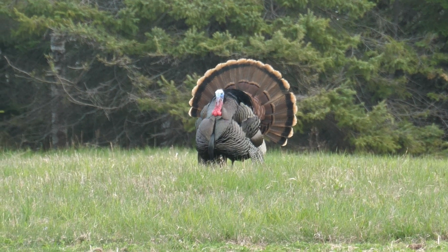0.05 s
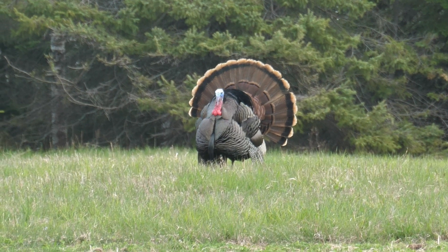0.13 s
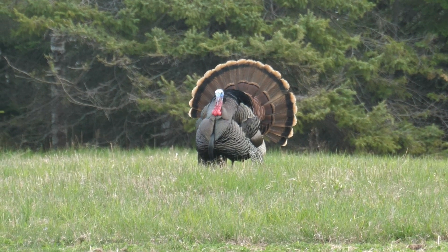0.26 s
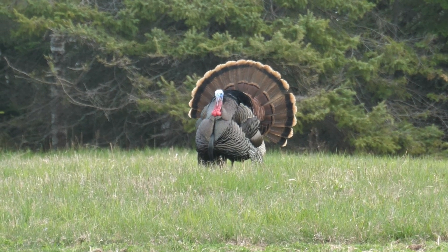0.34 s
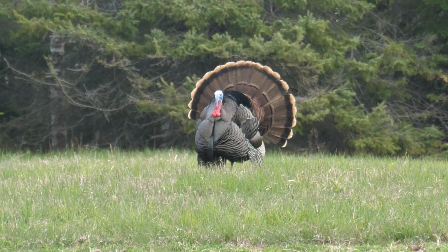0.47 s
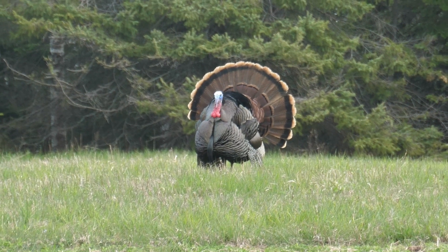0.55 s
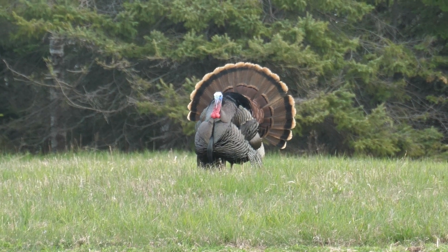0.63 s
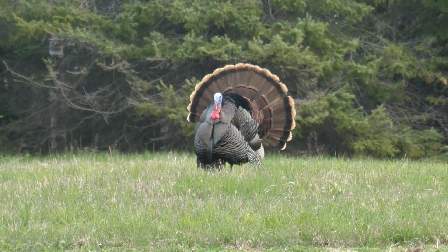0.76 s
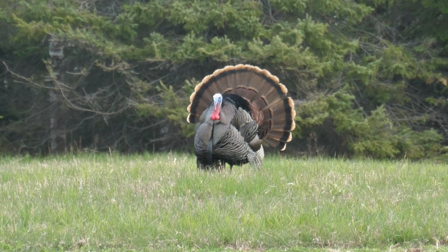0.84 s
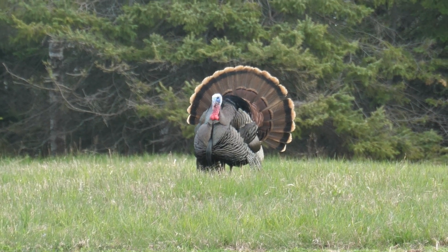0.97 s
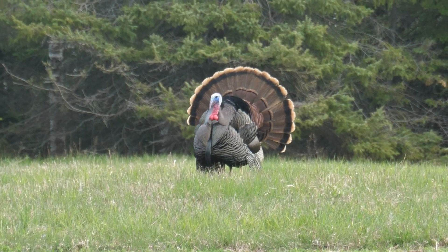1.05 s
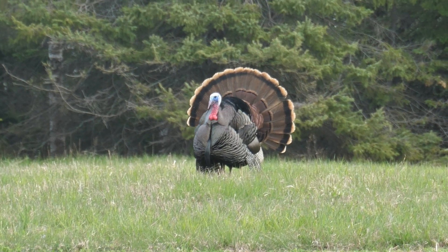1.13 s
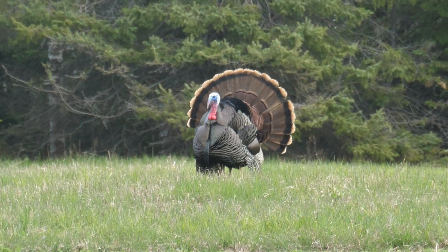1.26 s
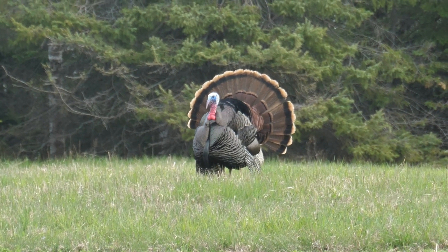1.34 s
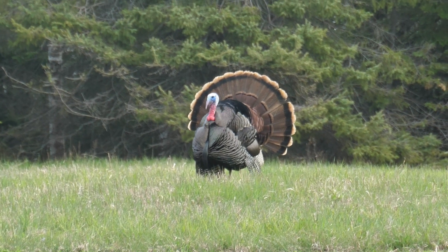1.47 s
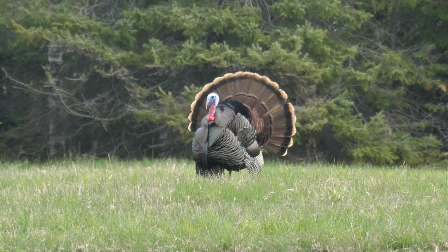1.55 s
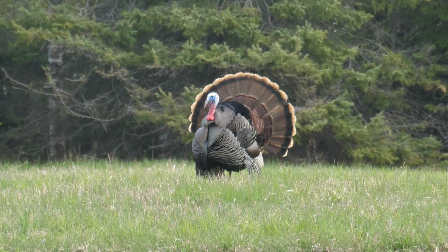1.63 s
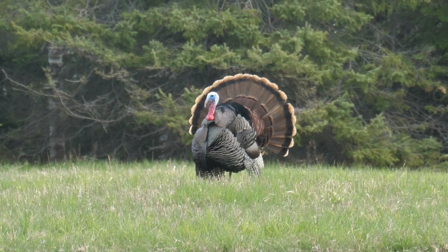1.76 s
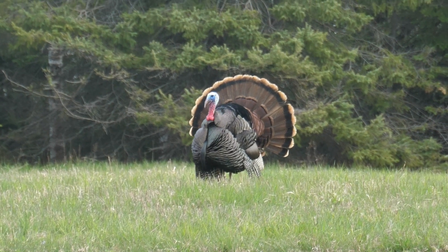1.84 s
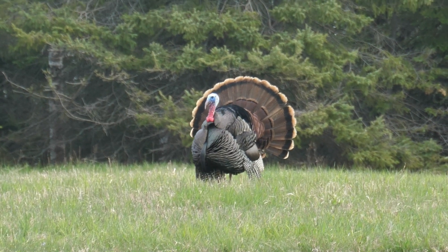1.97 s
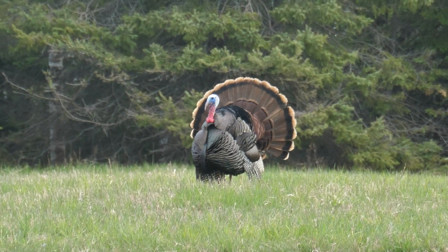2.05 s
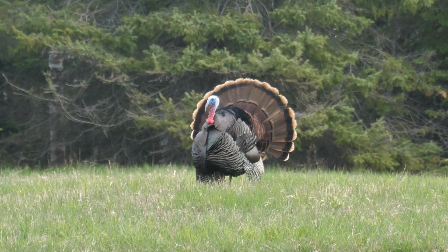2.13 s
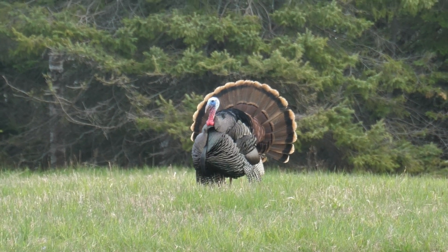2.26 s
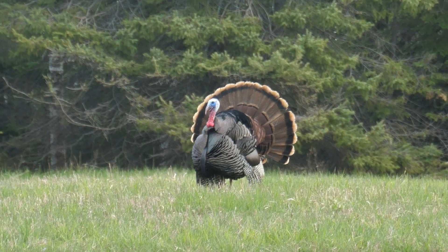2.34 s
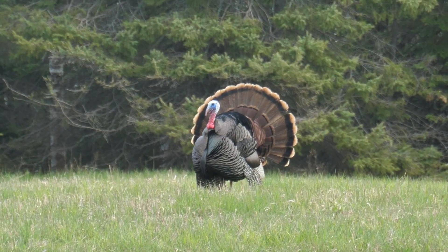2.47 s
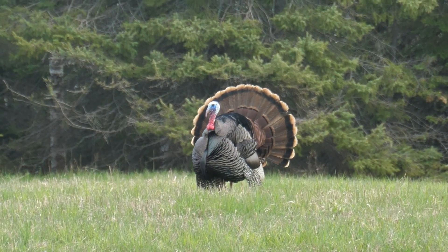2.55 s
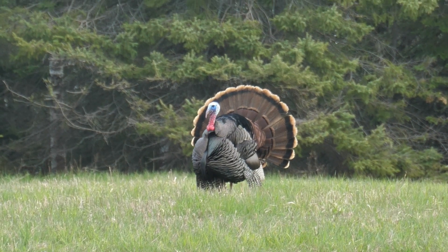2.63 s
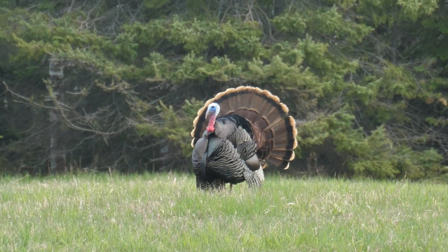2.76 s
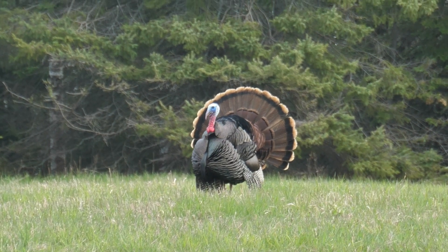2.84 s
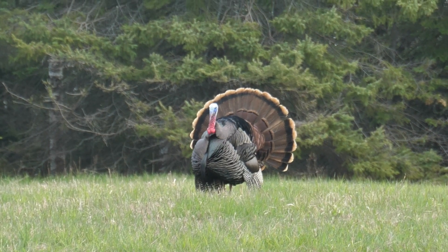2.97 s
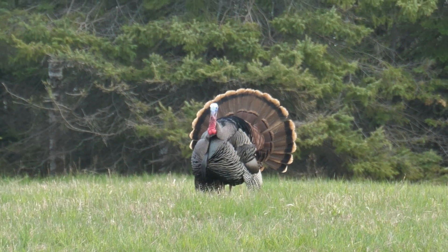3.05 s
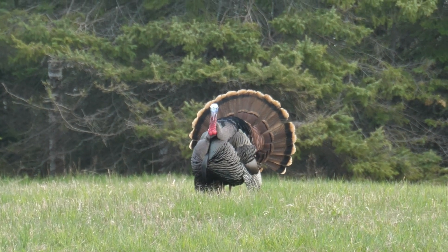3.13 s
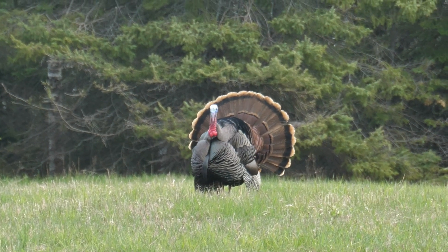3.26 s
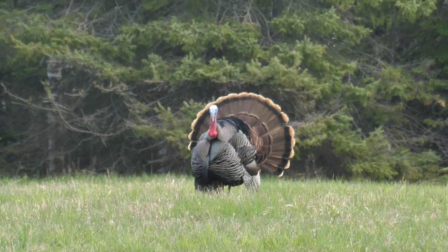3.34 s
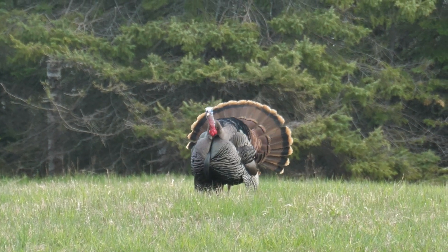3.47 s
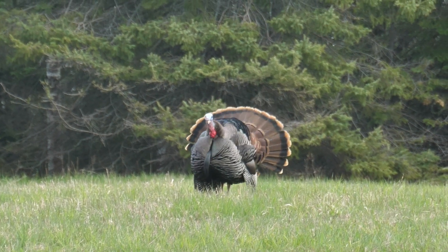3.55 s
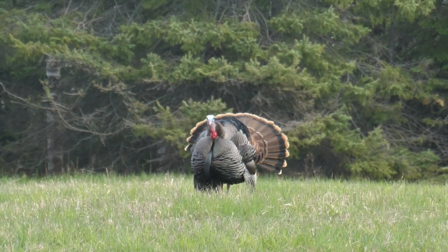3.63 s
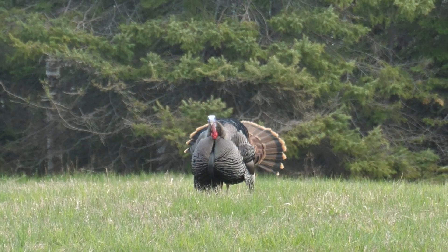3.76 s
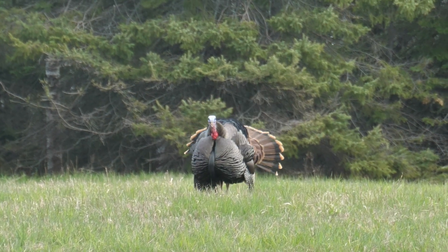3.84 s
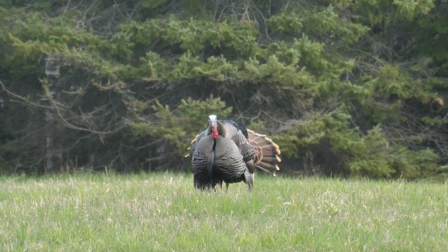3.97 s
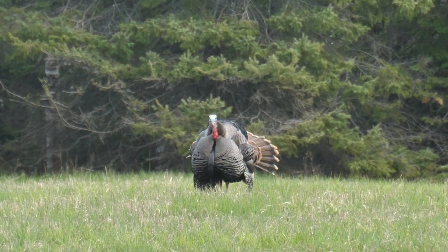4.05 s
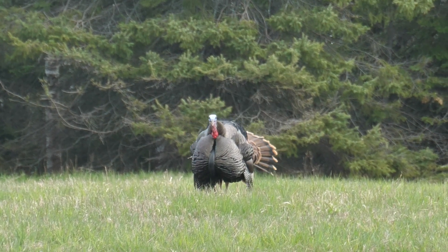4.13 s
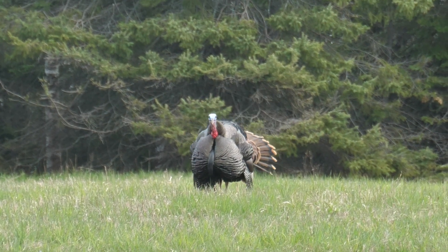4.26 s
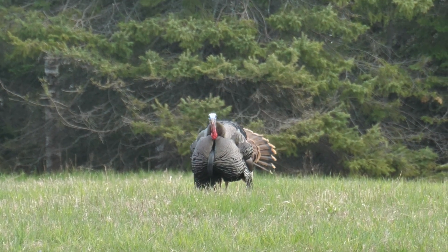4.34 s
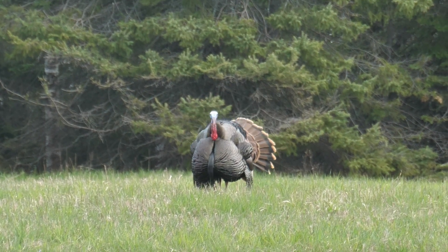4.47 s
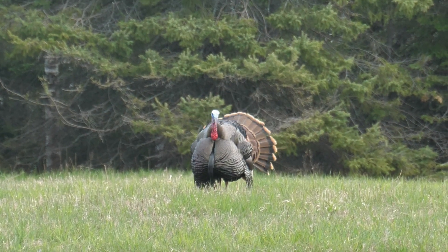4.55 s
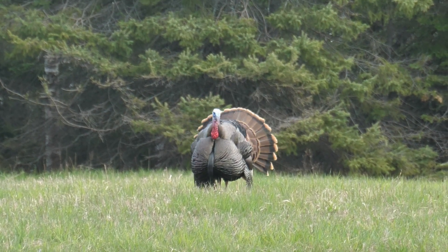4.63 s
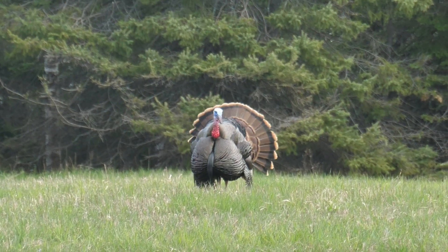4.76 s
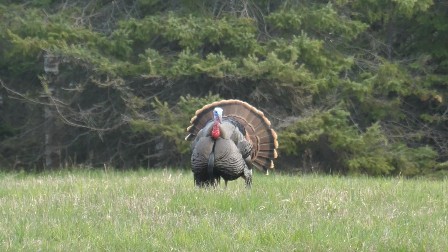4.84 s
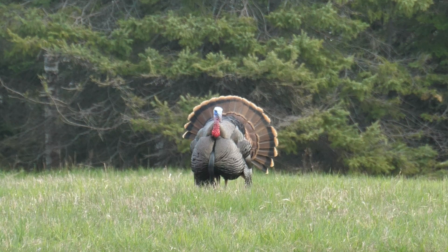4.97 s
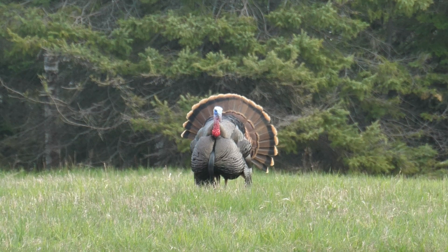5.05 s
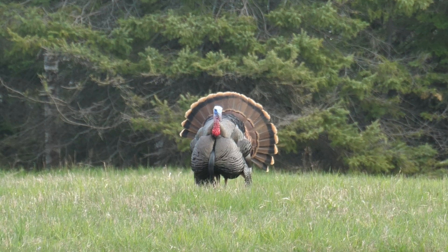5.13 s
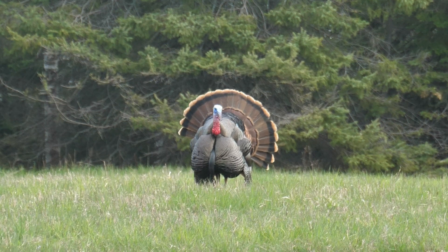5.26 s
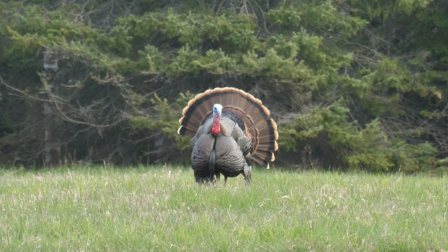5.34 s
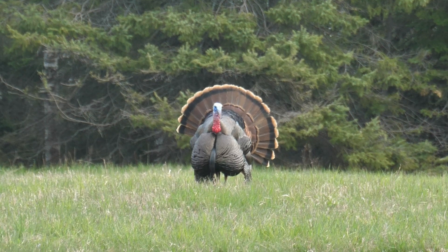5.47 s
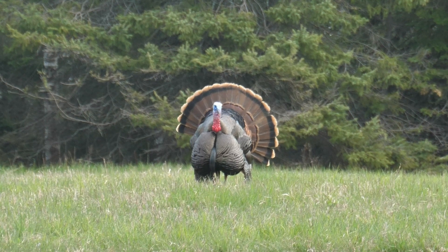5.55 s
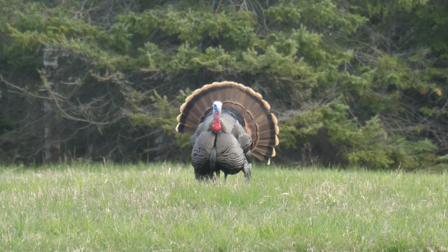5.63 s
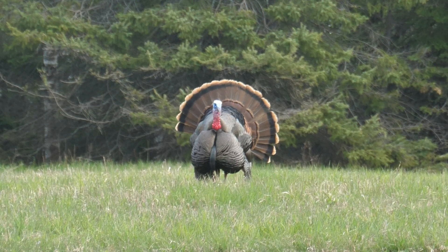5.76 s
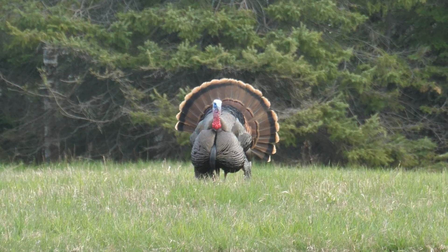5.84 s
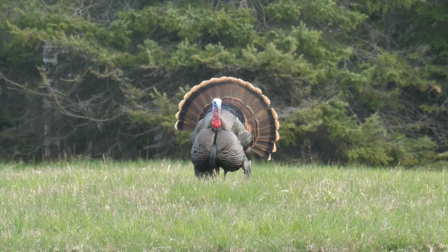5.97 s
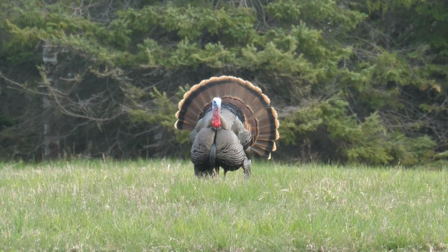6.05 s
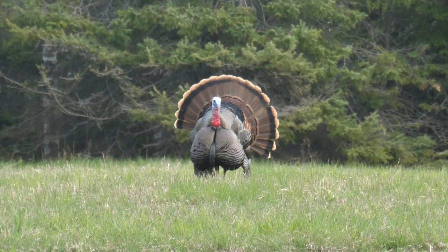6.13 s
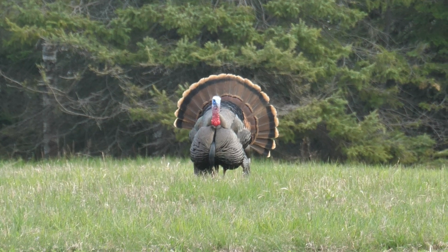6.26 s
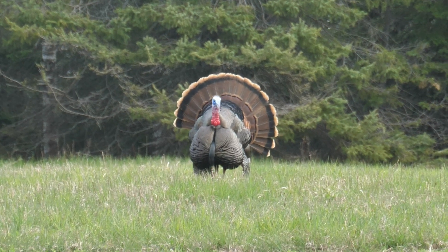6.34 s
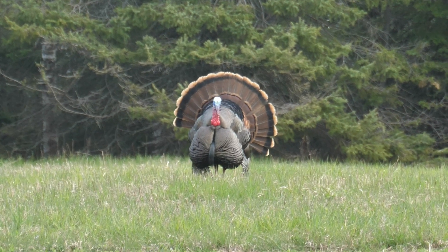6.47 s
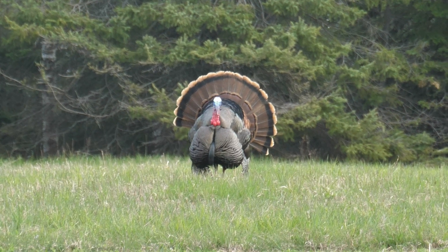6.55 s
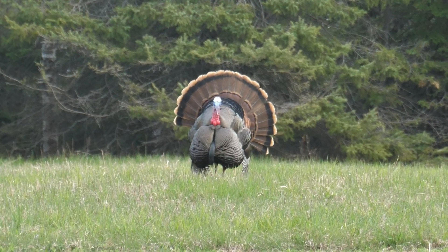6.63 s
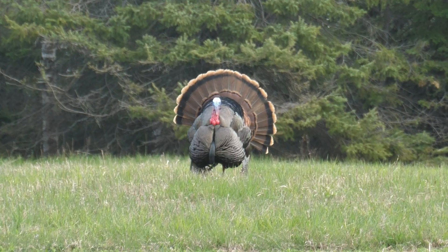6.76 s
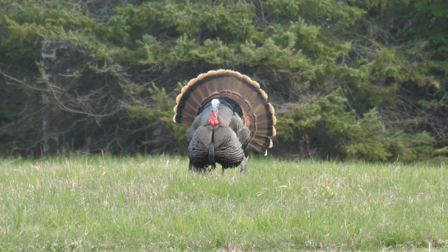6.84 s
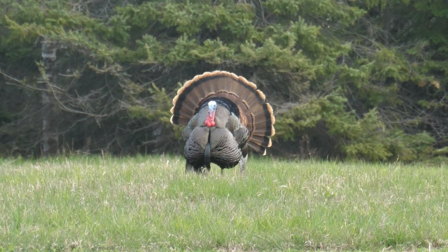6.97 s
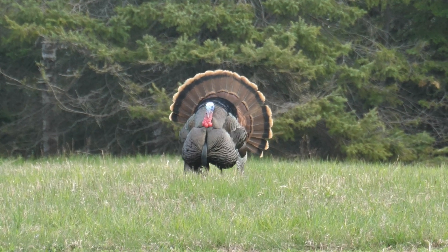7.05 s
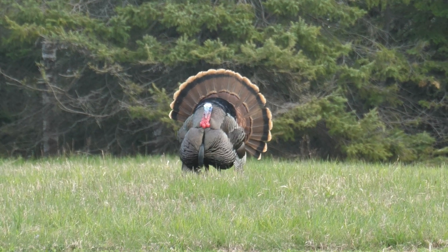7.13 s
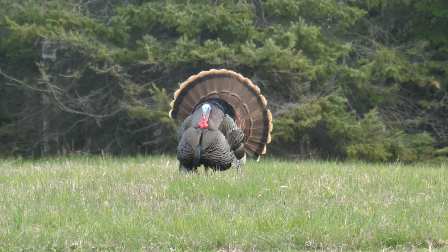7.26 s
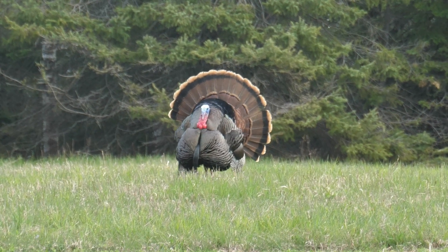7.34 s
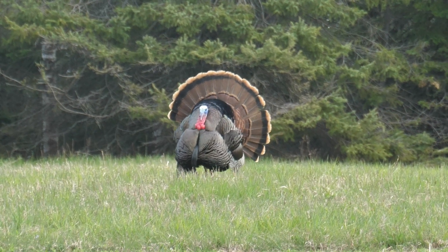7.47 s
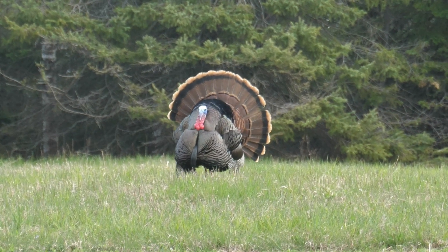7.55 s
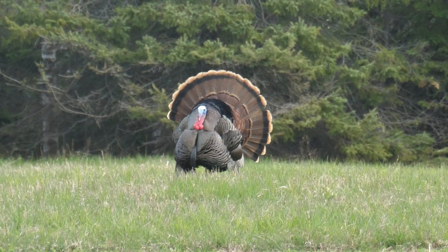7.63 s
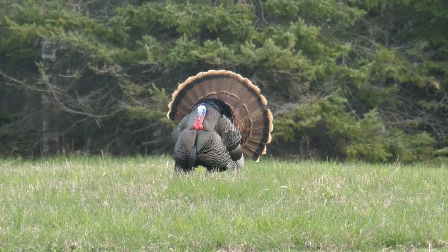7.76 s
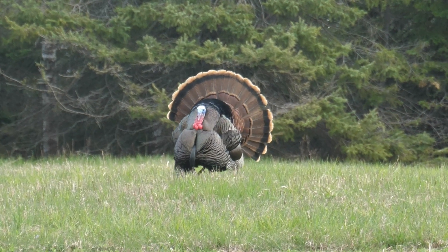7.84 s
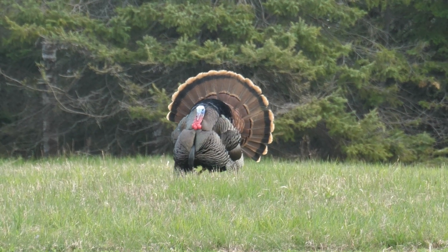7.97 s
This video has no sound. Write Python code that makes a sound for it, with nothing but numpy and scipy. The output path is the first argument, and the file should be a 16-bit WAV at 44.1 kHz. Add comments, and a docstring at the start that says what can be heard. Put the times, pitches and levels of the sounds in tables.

```python
"""A meadow before a wall of spruce. A wild turkey gobbles once, two harsh yelps and a rattle of short
notes, as his syrinx drives the resonances of throat and mouth; later he spits one dry puff of air.
Songbirds whistle gliding tones, a far call fades, and the trees scatter turkey and songbirds back as
echoes. Light air rumbles softly, with a few low thumps. The sound is all but mono."""
import sys
import numpy as np
from scipy import signal
from scipy.fft import rfft, irfft, next_fast_len
from scipy.io import wavfile

SR = 44100
rng = np.random.default_rng(int(sys.argv[2]) if len(sys.argv) > 2 else 0)


def waveform_to_disk(signal):
    """Save audio, clipped to [-1, 1], as 16-bit WAV at the path in sys.argv[1]."""
    frames = np.transpose(np.atleast_2d(signal))
    scaled = np.clip(frames, -1, 1) * 32767
    samples = np.round(scaled).astype(np.int16)
    wavfile.write(sys.argv[1], SR, samples)


N = 352800

# The yelps that open the gobble. Each row: start and length in seconds, effort in dB, the mouth
# resonance's first and last frequency and width in Hz, upper resonance in Hz, its relative level in dB.
YELPS = [(3.537, 0.062, -23, 1850, 1790, 915, 3200, -1), (3.593, 0.061, -20, 2100, 1240, 560, 4800, -8.5)]


def yelp(start, length, effort_db, first_hz, last_hz, width_hz, upper_hz, upper_db,
         pulse_hz=630, jitter=0.19, shimmer_db=1.5, rasp=0.035, attack_s=0.017, release_s=0.035):
    """Source and filter: uneven syrinx pulses ring a mouth resonance that drops as the neck extends."""
    t = np.arange(0, length, 1 / SR)
    n = len(t)
    drop = (1 + np.tanh((t - 0.024) / 0.0089)) / 2  # halfway down after 24 ms
    mouth_hz = first_hz + (last_hz - first_hz) * drop
    cycles = np.cumsum(pulse_hz * (1 + jitter * wander(n, 392))) / SR
    pulses = np.diff(np.floor(cycles), prepend=0) * amp(shimmer_db * wander(n, 500))
    source = butterworth(pulses + rasp * wander(n, SR), 2, [600, 7500])
    mouth = unit_rms(resonate(source, mouth_hz, width_hz))
    upper = amp(upper_db) * unit_rms(resonate(source, upper_hz, width_hz=1900))
    direct = amp(-13) * unit_rms(butterworth(source, 4, [3800, 6200]))  # straight out of the open beak
    envelope = np.minimum(t / attack_s, 1) * ramp((length - t) / release_s)
    return start, amp(effort_db) * (mouth - upper + direct) * envelope


# Three families of windpipe and throat resonances. Each row: frequency in Hz, width in Hz, gain in dB.
LOW_MODES = [(1020, 340, 12), (564, 53, -9)]
RING_MODES = [(3173, 310, 4.5), (3730, 380, -2.5)]
OVERTONE_MODES = [(2220, 1070, 9.5), (4100, 1100, 5.5), (5300, 1200, 5), (6720, 530, 0.5)]


def gobble_note(peak, length, hz, glide, rough, low_db, ring_db, overtones_db,
                lean=0, throat_tuning=1, jitter=0.1066, flutter=2.67, slope_db_per_octave=-5.5):
    """Amplitude modulation: a slower second vibration of the syrinx adds sidebands to a harmonic tone."""
    t, bell = swell(length, lean)
    n = len(t)
    settle_s = 0.67 * length
    octaves = glide * settle_s * np.tanh(t / settle_s)  # the pitch slides fastest at the peak
    cycles = np.cumsum(hz * 2 ** octaves * (1 + jitter * rough * wander(n, 605))) / SR
    tone = unit_rms(sum(amp(slope_db_per_octave * np.log2(k)) * np.cos(2 * np.pi * k * cycles)
                        for k in range(1, 9)))
    modulator = np.cos(2 * np.pi * .44 * cycles + .7 * wander(n, 120))
    source = tone * (1 + flutter * rough * modulator) + rough * wander(n, SR)
    low = amp(low_db) * formants(source, LOW_MODES)
    ring = amp(ring_db) * formants(source, np.multiply(RING_MODES, [throat_tuning, 1, 1]))
    overtones = amp(overtones_db) * formants(source, OVERTONE_MODES)
    direct = amp(overtones_db - 25.5) * unit_rms(butterworth(source, 2, [6400, 9000]))  # open beak
    return peak + t[0], (low + ring + overtones + direct) * bell


# The rattle's loud notes, mostly paired. Each row: peak time and length in seconds, pitch in Hz, glide in
# octaves per second, lean from -1 (sharp start) to 1 (sharp end), level in dB, roughness from 0 to 1,
# then the low and ring resonances in dB relative to that level.
RATTLE_NOTES = [ (3.687, .011, 1028, -7, -0.1, -30, 0.22, -2, 9),
                (3.734, .015, 1077, -4, -0.36, -26, 0.66, 3, -1.5),
                (3.776, 0.025, 1091, -1.5, 0.27, -24.5, 0.5, 2.5, 1.5),
                (3.882, 0.013, 1044, -4.5, -.35, -27.5, .37, -4.5, 3),
                (3.923, 0.014, 1065, -4.5, 0, -24.5, 0.39, -1.5, 2.5),
                (4.038, 0.018, 1040, -4.5, -0.53, -30, 0.32, -6.5, 3.5),
                (4.077, .009, 1018, -14, 0, -26.5, 0.31, 3, -2),
                (4.200, 0.015, 1026, -2.5, -.4, -27, 0.34, 0.5, 4),
                (4.245, 0.018, 1026, -9.5, 0.45, -27, 0.23, 1, 1),
                (4.361, .010, 1050, -8, -0.34, -28.5, 0.2, -6, 1),
                (4.402, 0.02, 1100, -4.5, 0.41, -25.5, 0.24, -7, -1),
                (4.523, .018, 1102, -3, -0.097, -27.5, 0.09, -4, -0.5)]
# Between pairs the voice slackens into a dull hoot and a hoarse burr. Each row: burr time in seconds,
# burr level in dB, the hoot's lead in seconds, its pitch in Hz, its level in dB.
SLACK_NOTES = [(3.819, -37, .008, 1103, -25.5), (3.978, -31.5, .023, 925, -27), (4.154, -33, .02, 898, -36),
               (4.317, -34.5, .025, 846, -35), (4.479, -34, .028, 921, -37)]
# A hum while the bird pushes hardest: peak time and length in seconds, pitch in Hz, level in dB.
UNDERTONE = (4, 0.55, 1079.5, -40.5)


def rattle():
    """Tension shapes timbre: sharp falling notes alternate with slack hoots and tight-throated burrs."""
    voice = np.zeros(N)
    for peak, length, hz, glide, lean, db, rough, low_db, ring_db in RATTLE_NOTES:
        add(voice, *gobble_note(peak, length, hz, glide, rough, db + low_db, db + ring_db, db, lean))
    for peak, burr_db, lead, hoot_hz, hoot_db in SLACK_NOTES:
        add(voice, *gobble_note(peak - lead, length=.02, hz=hoot_hz, glide=-4, rough=0.51,
                                low_db=hoot_db, ring_db=hoot_db - 5.5, overtones_db=hoot_db - 5.5))
        add(voice, *gobble_note(peak, length=.026, hz=1083, glide=0, rough=0.5, throat_tuning=1.019,
                                low_db=burr_db - 3, ring_db=burr_db + 3, overtones_db=burr_db))
    peak, length, hz, db = UNDERTONE
    add(voice, *gobble_note(peak, length, hz, glide=-.7, rough=.35,
                            low_db=db, ring_db=db - 14, overtones_db=db - 14))
    return voice


# The beak's resonances in the spit. Each row: frequency in Hz, width in Hz, gain in dB.
BEAK_MODES = [(2640, 1200, 1.5), (4900, 1300, 1), (6800, 2200, -3)]


def spit(start=7.047, length=0.042, db=-32.5, decay_db_per_s=250, attack_s=0.0047, release_s=0.016):
    """Turbulence: a puff of air forced through the beak hisses and excites its resonances."""
    t = np.arange(0, length, 1 / SR)
    hiss = butterworth(wander(len(t), SR), 3, [1700, 9500])
    puff = ramp(t / attack_s) * amp(db - decay_db_per_s * t) * ramp((length - t) / release_s)
    return start, formants(hiss, BEAK_MODES) * puff


def whistle(start, length, from_hz, to_hz, db, waver_hz=12, fade_db=-5, flutter_db=3, attack_s=0.0063):
    """Scattering frays a songbird's gliding tone, most in the low notes from deeper in the boughs."""
    t = np.arange(0, length, 1 / SR)
    n = len(t)
    hz = from_hz * (to_hz / from_hz) ** (t / length)
    cycles = np.cumsum(hz + waver_hz * wander(n, 150)) / SR
    fray = 0.57 / (1 + (hz / 3300) ** 8) * wander(n, 170)
    tone = unit_rms(np.sin(2 * np.pi * cycles) + fray * np.cos(2 * np.pi * cycles))
    level = amp(db + fade_db * t / length + flutter_db * wander(n, 55))
    return start, tone * level * ramp(t / attack_s) * signal.windows.tukey(n, .15)


# Slurred whistles. Each row: start and length in seconds, first and last pitch in Hz, relative level in dB.
WHISTLES = [ (0, .14, 3320, 3310, -55), (.01, 0.084, 2580, 2320, -53), (0.12, 0.049, 2416, 2470, -43.5),
            (0.16, 0.12, 2786, 2200, -42), (0.397, 0.094, 2380, 2240, -43.5),
            (1.22, .14, 4300, 4220, -53.5), (1.328, .105, 4160, 4180, -46.5),
            (1.782, 0.063, 3870, 3890, -46), (1.803, 0.12, 3540, 3580, -53),
            (2.878, 0.093, 4100, 3850, -52), (3.239, .028, 4150, 4050, -45), (3.378, .03, 3750, 3200, -45),
            (3.41, 0.089, 2710, 2375, -40), (4.026, 0.062, 2840, 2900, -32.5),
            (4.24, 0.064, 2750, 2550, -37), (4.597, 0.026, 3280, 2830, -44),
            (4.641, 0.067, 2824, 2870, -38.5), (4.677, 0.042, 2940, 3180, -39.5),
            (4.738, 0.061, 2596, 2636, -40.5), (5.2, 0.062, 2505, 2660, -43),
            (5.221, 0.063, 3100, 1994, -41.5), (5.268, .07, 2020, 2100, -48), (5.29, .08, 2520, 2410, -46),
            (5.771, 0.063, 2360, 2440, -46.5), (5.825, 0.096, 2714, 2260, -38.5),
            (6.039, 0.092, 2386, 2210, -42.5), (6.185, 0.057, 2310, 2240, -50)]
# Another small bird's thin chips. Each row: start in seconds, pitch in Hz, relative level in dB.
CHIPS = [(1.61, 6770, -42), (3.012, 6770, -47), (3.99, 7000, -42), (5.355, 6960, -49.5), (7.522, 7050, -47)]


def songbirds(chip_rise=1.069, twitter_hz=3800):
    """Frequency sweeps make birdsong: slurred whistles, rising chips and a faint twitter farther back."""
    song = np.zeros(N)
    for row in WHISTLES:
        add(song, *whistle(*row))
    for start, hz, db in CHIPS:
        add(song, *whistle(start, 0.0363, hz, hz * chip_rise, db, waver_hz=188))
    for start in np.linspace(2.1, 2.9, 12):
        offset, slur = rng.uniform(-0.41, 0.1, 2)
        hz = twitter_hz * 2 ** offset
        add(song, *whistle(start, 0.052, hz, hz * 2 ** (slur / 2), db=-57))
    return song


def far_call(length=1.18, hz=892, sag_hz_per_s=42, width_hz=170, db=-49.5, fade_db=-6):
    """Attenuation with distance leaves a call's lowest partial, smeared by the woods to a narrow band."""
    t = np.arange(0, length, 1 / SR)
    band = unit_rms(resonate(wander(len(t), SR), hz - sag_hz_per_s * t, width_hz))
    return 0, band * amp(db + fade_db * (t / length) ** 2) * signal.windows.tukey(len(t), .05)


# Reverberation time of the woods. Each row: frequency in Hz, time to fall 60 dB in seconds.
WOODS_T60 = [(500, .8), (1100, .9), (2500, 1.0), (3500, .7), (7000, .35)]
# Spectra of the turkey's and the songbirds' echoes. Each row: frequency in Hz, relative gain in dB.
TURKEY_ECHO = [(500, 9), (1000, 4.5), (1500, 2), (2200, -3), (3300, -6.5), (7000, -9)]
SONGBIRD_ECHO = [(2500, -3.5), (4200, -8), (7000, -12)]


def woods(sound, colour, bands=8, echoes_per_s=1500, build_up_s=.03):
    """Reverberation: trunks and boughs scatter a call back as sparse echoes; the treble dies first."""
    t, hz = np.arange(SR) / SR, np.fft.rfftfreq(SR, 1 / SR)
    echoes = rng.standard_normal(SR) * (rng.random(SR) < echoes_per_s / SR)
    spectrum = rfft(unit_rms(echoes))
    build_up = (1 - np.exp(-t / build_up_s)) ** 2
    centres, tail = np.geomspace(400, 8000, bands), np.zeros(SR)
    for centre, share in zip(centres, np.eye(bands)):
        envelope = build_up * amp(-60 * t / value_at(WOODS_T60, centre))
        band = irfft(spectrum * np.interp(hz, centres, share), SR)
        tail += amp(value_at(colour, centre)) * band * envelope / np.linalg.norm(envelope)
    return signal.fftconvolve(sound, tail)[:N]


# Soft low thumps. Each row: peak time and length in seconds, frequency in Hz, level in dB.
THUMPS = [(0.133, 0.066, 120, -40), (.14, 0.093, 57.7, -41), (0.805, 0.034, 115, -39),
          (3.274, 0.045, 64, -40), (4.04, 0.048, 124, -35.5), (4.229, 0.114, 65.5, -42),
          (4.426, 0.47, 76.5, -46.5), (6.098, 0.018, 129, -32), (7.859, 0.05, 125, -40.5)]


def thump(peak, length, hz, db):
    """A tone burst: bass of wandering phase swells and fades."""
    t, bell = swell(length)
    bass = unit_rms(np.sin(2 * np.pi * hz * t + .5 * wander(len(t), 38)))
    return peak + t[0], amp(db) * bell * bass


# The spectrum of the open air. Each row: frequency in Hz, relative spectral density in dB.
AIR_SPECTRUM = [(8.8, -47), (15, 10.5), (28, -0.5), (108, -1), (158, -5.5), (205, -3), (299, -6.5),
                (345, -6.5), (825, -11.5), (1430, -14.5), (1560, -16.5), (1920, -16), (2880, -18),
                (3230, -19.5), (15500, -28)]
# One gust: peak time and half length in seconds, lift of the rumble in dB.
GUST = (0.12, 0.031, 6.3)


def air(wash_db=-41, rumble_top_hz=250, drift_db=-1.53, drift_hz=1, side_db=-71):
    """Broadband noise whose bass is modulated by the breeze; a trace of hiss differs between the ears."""
    t, hz = np.arange(N) / SR, np.fft.rfftfreq(N, 1 / SR)
    spectrum = rfft(rng.standard_normal(N)) * amp(value_at(AIR_SPECTRUM, hz))
    wash = amp(wash_db) * unit_rms(irfft(spectrum, N))
    rumble = irfft(rfft(wash) / (1 + (hz / rumble_top_hz) ** 4), N)
    peak, half_length, lift_db = GUST
    gust_db = lift_db * np.exp(-((t - peak) / half_length) ** 2)
    breeze = amp(gust_db + drift_db * wander(N, drift_hz))
    side = amp(side_db) * unit_rms(butterworth(rng.standard_normal(N), 8, 5200, "high"))
    return wash + rumble * (breeze - 1) + np.array([side, -side])


def resonate(x, hz, width_hz):
    """Resonance: two stages with unit gain at a centre frequency that may glide."""
    carrier = np.exp(2j * np.pi * np.cumsum(hz * np.ones(len(x))) / SR)
    r = np.exp(-np.pi * width_hz / SR)
    baseband = signal.lfilter([(1 - r) ** 2], [1, -2 * r, r * r], x / carrier + 1e-18)
    return 2 * (carrier * baseband).real


def formants(x, modes):
    """Parallel resonances, summed to rms 1; alternating signs keep the valleys between them filled."""
    return unit_rms(sum((-1) ** k * amp(db) * resonate(x, hz, width_hz)
                        for k, (hz, width_hz, db) in enumerate(modes)))


def butterworth(x, order, edges_hz, kind="band"):
    """A filter with a maximally flat passband."""
    return signal.sosfilt(signal.butter(order, edges_hz, kind, fs=SR, output="sos"), x)


def wander(size, hz):
    """Low-passed noise of rms about 1 that changes about hz times a second."""
    span = max(2 ** 15, next_fast_len(size))
    lowpass = np.exp(-(np.fft.rfftfreq(span, 1 / SR) / hz) ** 2)
    return unit_rms(irfft(rfft(rng.standard_normal(span)) * lowpass, span))[:size]


def swell(length, lean=0):
    """Time around a peak, and a bell above half height for the given length; lean lengthens the rise."""
    rise, fall = length * (1 + np.clip(lean, -.8, .8) * np.array([1, -1]))
    t = np.arange(-1.7 * rise, 1.7 * fall, 1 / SR)
    bell = 2 ** -(abs(2 * t / np.where(t < 0, rise, fall)) ** 1.7)
    return t, bell * signal.windows.tukey(len(t), .2)


def ramp(x):
    """A smooth step from 0 to 1 as x goes from 0 to 1."""
    return np.sin(np.pi / 2 * np.clip(x, 0, 1)) ** 2


def amp(db):
    """Decibels to gain."""
    return 10 ** (np.asarray(db) / 20)


def unit_rms(x):
    """Scales to rms 1."""
    return x / np.sqrt(np.mean(x ** 2) + 1e-20)


def value_at(points, hz):
    """Interpolation on a log-frequency axis."""
    frequencies, values = np.transpose(points)
    return np.interp(np.log(hz + 1), np.log(frequencies + 1), values)


def add(mix, start, sound):
    """Mixes a sound in at a start time in seconds."""
    part = mix[max(round(start * SR), 0):][:len(sound)]
    part += sound[:len(part)]


def scene(turkey_echo_db=-7, bird_db=-2, bird_echo_db=-1.5):
    """Superposition of direct sound and echo: the turkey in the open, the songbirds deep in the trees."""
    turkey, background = rattle(), np.zeros(N)
    for row in YELPS:
        add(turkey, *yelp(*row))
    add(turkey, *spit())
    birds = songbirds()
    for row in THUMPS:
        add(background, *thump(*row))
    add(background, *far_call())
    turkey = turkey + amp(turkey_echo_db) * woods(turkey, TURKEY_ECHO)
    birds = amp(bird_db) * birds + amp(bird_echo_db) * woods(birds, SONGBIRD_ECHO)
    return turkey + birds + background + air()


def record(dry):
    """Band limiting: a steep low-pass removes the highest treble."""
    lowpass = signal.firwin(511, 15850, window=("kaiser", 9), fs=SR)
    return signal.oaconvolve(dry, lowpass[None], "same", axes=1)


dry = scene()
out = record(dry)
waveform_to_disk(out)
```